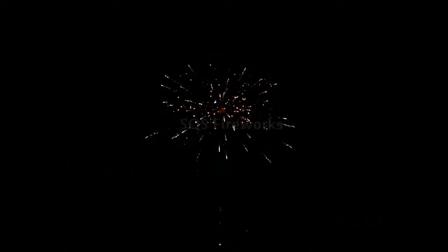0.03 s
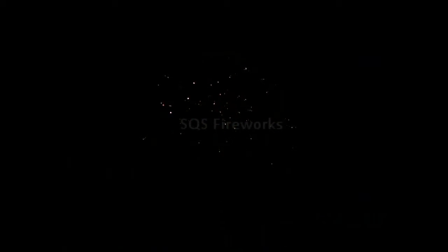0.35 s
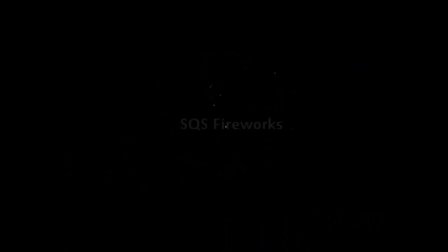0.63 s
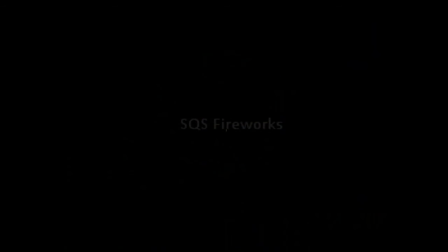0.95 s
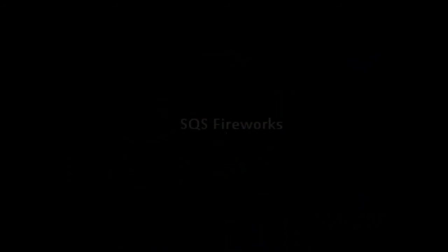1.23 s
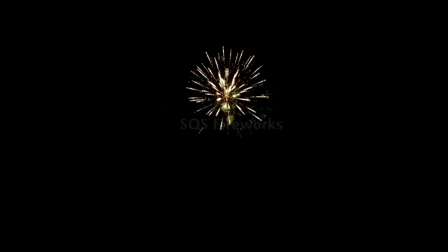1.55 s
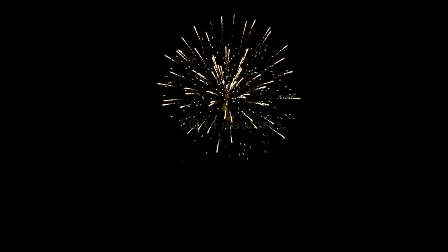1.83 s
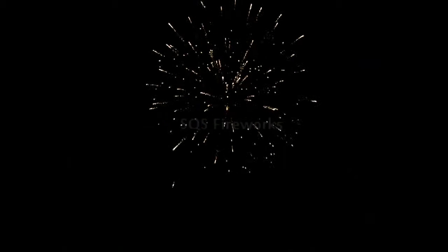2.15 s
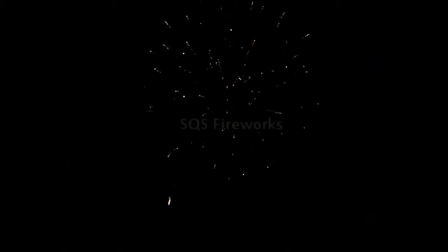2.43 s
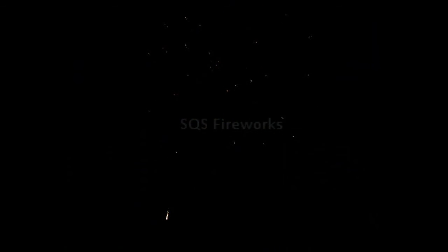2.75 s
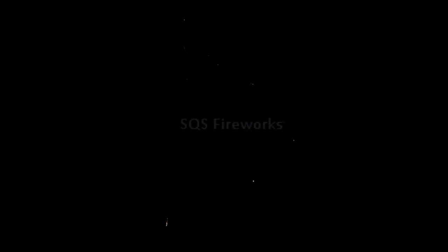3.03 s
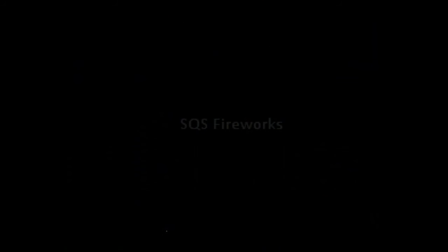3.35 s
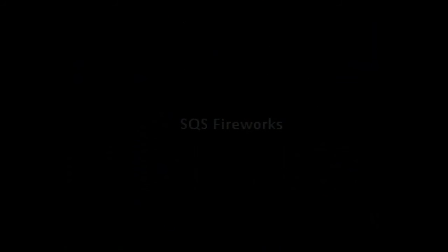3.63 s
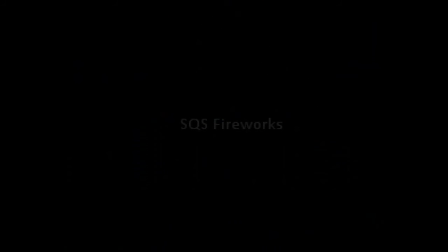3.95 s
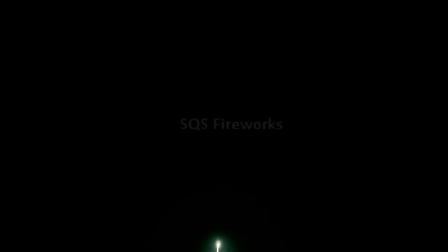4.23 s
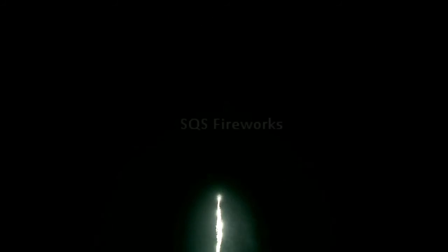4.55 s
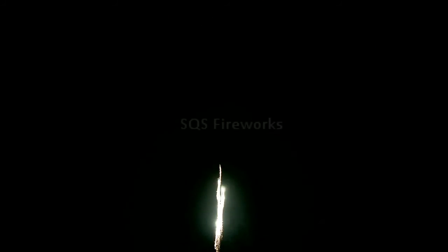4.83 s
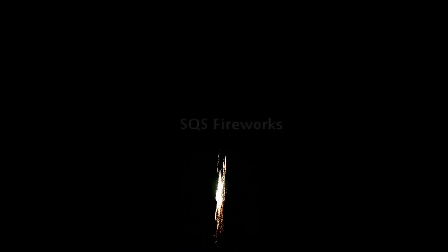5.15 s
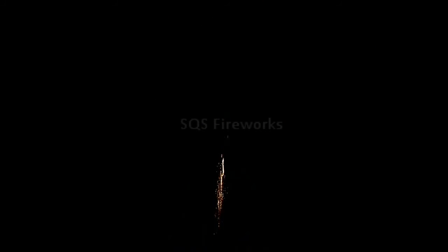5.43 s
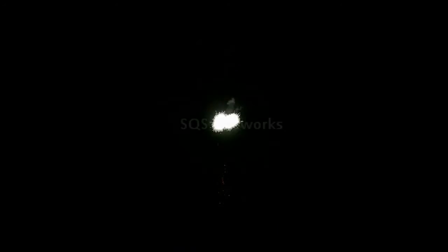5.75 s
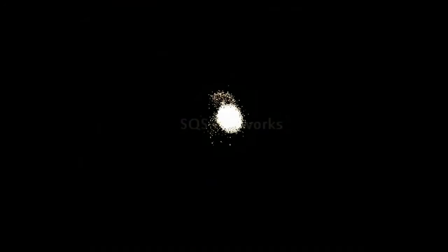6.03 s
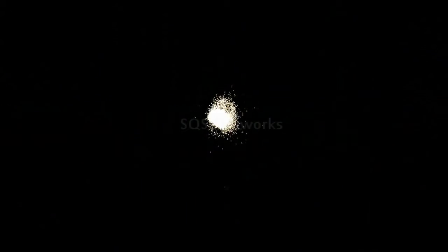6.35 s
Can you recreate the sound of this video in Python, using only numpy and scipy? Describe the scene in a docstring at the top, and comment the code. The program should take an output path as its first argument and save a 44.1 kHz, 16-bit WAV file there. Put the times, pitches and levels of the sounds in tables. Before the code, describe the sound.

A sharp firework bang echoes outdoors, then rapid launch thuds and a faint sizzle lead into a dense run of loud cracks.

```python
"""A fireworks cake fires outdoors at night. Single shells burst overhead, each a shock front, a few low
cycles and a crack, and their echoes roll round the surroundings. Fifteen lift charges thud in quick
succession, each slapped back by walls; the shells sizzle faintly as they climb, then burst in a dense run.
The bangs pull down a gain control and overload a limiter."""
import sys
import numpy as np
from scipy import signal
from scipy.fft import rfft, irfft, next_fast_len
from scipy.io import wavfile
from scipy.ndimage import uniform_filter1d

SR = 44100
rng = np.random.default_rng(int(sys.argv[2]) if len(sys.argv) > 2 else 0)


def inscribe(sig):
    """Save sig as 16-bit PCM at rate SR to the path in sys.argv[1].

    A 1-D sig is mono; a 2-D sig holds one channel per row.
    Samples are clipped to [-1, 1] before scaling.
    """
    pcm = np.round(np.clip(np.atleast_2d(sig).T, -1, 1) * 32767)
    wavfile.write(sys.argv[1], SR, pcm.astype(np.int16))


N = 286209


def gain_of(db):
    """Decibels to gain."""
    return 10 ** (np.asarray(db) / 20)


def unit_rms(x):
    """Scales to rms 1."""
    return x / np.sqrt(np.mean(x ** 2) + 1e-20)


def curve_at(points, hz):
    """Interpolates a table on a log-frequency axis."""
    points_hz, values = np.transpose(points)
    return np.interp(np.log(hz + 1), np.log(points_hz + 1), values)


def clock(length_s):
    """Sample times from zero."""
    return np.arange(int(length_s * SR)) / SR


def add(mix, start_s, sound):
    """Mixes a sound in; start_s may be negative."""
    at = round(start_s * SR)
    sound = sound[..., max(-at, 0):]
    part = mix[:, max(at, 0):][:, :sound.shape[-1]]
    part += sound[..., :part.shape[1]]


def lowpass(x, hz, order=2):
    """Causal Butterworth low-pass."""
    return signal.sosfilt(signal.butter(order, hz, fs=SR, output="sos"), x)


# Likeness of the two channels. Each row: frequency in Hz, left-right correlation.
STEREO_CORRELATION = [(25, .975), (100, .993), (300, 0.99), (550, 0.96), (1000, 0.9), (2000, 0.69),
                      (2600, .6), (3400, -.4), (4700, -.55), (7000, 0.03)]


def scatter(spectrum, samples, grain_db=0, width_db=0):
    """Countless small arrivals of uneven size at two microphones, as coloured noise."""
    length = next_fast_len(samples, True)
    grains = gain_of(grain_db * np.minimum(rng.standard_normal(length // 64 + 1), 2))
    envelope = unit_rms(np.repeat(grains, 64)[:length])
    mid, side = rfft(rng.standard_normal((2, length)) * envelope)
    hz = np.fft.rfftfreq(length, 1 / SR)
    correlation = curve_at(STEREO_CORRELATION, hz)
    side = side * np.sqrt((1 - correlation) / (1 + correlation)) * gain_of(width_db)
    colour = gain_of(curve_at(spectrum, hz)) * np.sqrt(SR / 2)
    return irfft(np.array([mid + side, mid - side]) * colour, length)[:, :samples]


def belt_level_db(belts, delay_s, hz, split_hz=480):
    """Each belt of terrain's echo swells to its peak delay, then falls with path length."""
    treble = (hz ** 2 / (hz ** 2 + split_hz ** 2))[:, None]
    power = 0
    for peak_s, bass_db, treble_db, rise_db, fall_db in belts:
        doublings = np.log2(np.maximum(delay_s, 1e-3) / peak_s)
        swell_db = np.minimum(rise_db * doublings, -fall_db * doublings)
        power = power + gain_of((1 - treble) * bass_db + treble * treble_db + swell_db) ** 2
    return 10 * np.log10(power + 1e-20)


def rolling_echo(spectrum, belts, length_s, grain_db, clump_db, width_db):
    """Echoes return in clumps; the longer their path, the more treble the air absorbs."""
    t = clock(length_s)
    hz, delay_s, frames = signal.stft(scatter(spectrum, len(t), grain_db, width_db), SR, nperseg=512)
    clumps = unit_rms(uniform_filter1d(rng.standard_normal(len(delay_s)), size=4))
    air_db_per_s = 1.79 * (np.minimum(hz[:, None], 4780) / 1000) ** 1.425
    frames *= gain_of(belt_level_db(belts, delay_s, hz) + clump_db * clumps - air_db_per_s * delay_s)
    echo = signal.istft(frames, SR, nperseg=512)[1][:, :len(t)]
    return echo * (1 - np.exp(-t / 0.0045))


# Shell bursts. Each row: start in seconds, blast in dB, nominal ring pitch in Hz, ring length in seconds,
# push in dB re blast, front in dB, crack in dB, crack length in seconds, near scatter in dB,
# echo treble in dB, echo bass in dB.
BURSTS = [(-.413, 4, 240, .009, -8, 0, -2, .008, 6.8, 2.5, 1.8),
          (1.6963, 6, 234, 0.0075, -9, 1, 0, 0.0072, 6.5, 0.5, 3),
          (1.823, 1, 248, 0.0071, -10, -10, -2.5, 0.0076, -1, -19, -7),
          (6.0341, 4.5, 306, 0.0082, -5, 3, -2, 0.0074, 7.5, 3.5, 4),
          (6.0398, 2, 306, 0.01, -9, 7.5, -2, 0.0083, -5, -22, -17),
          (6.1307, 3, 276, 0.0061, -14, 10, -3, 0.01, 3, -2, -1.5),
          (6.164, -12, 483, 0.006, -12, -10, -9, 0.0043, 1, -12, -9),
          (6.1671, 1, 674, 0.0075, -11, -14, -0.5, .009, -3, -17, -13),
          (6.173, 1, 237, 0.0091, -14, -12, -5.5, 0.0072, -1, -18, -16),
          (6.2148, 5, 292, 0.01, -14, 0, 0, 0.0072, 0.5, -11, -8),
          (6.236, 3, 298, 0.0087, -14, -4, -2, 0.0075, -1, -12, -12),
          (6.252, 3.5, 232, .011, -14, -4, -5, 0.0086, -6.5, -14, -18),
          (6.259, 4, 302, 0.0086, -12, -8, -4.5, 0.0088, 3.5, -12, -6),
          (6.3438, -11, 241, .005, -6, -14, -6, .005, -2, -17, -14),
          (6.347, 4, 260, 0.0079, -8, -19, -5, 0.0063, 0, -16, -9),
          (6.366, -2, 281, .009, -12, -3, 0, 0.0076, -4, -9, -8),
          (6.382, 4.5, 236, 0.011, -15, -16, -0.5, 0.0093, 1.5, -6, 0),
          (6.3982, 6, 312, 0.0088, -11, -6, -0.5, 0.008, 2, -12, -10),
          (6.416, -0.5, 328, 0.01, -7, -4, -3.5, 0.0094, -5, -20, -18),
          (6.462, 3, 284, 0.0093, -13, 6, -0.5, 0.0081, -8, -18, -20),
          (6.4793, 1, 331, 0.0068, -10, -6, -2.5, .009, -5, -16, -16)]
# Spectra of the crack, near scatter and roll. Each row: frequency in Hz, relative density in dB.
CRACK_SPECTRUM = [(60, -33), (300, 3), (450, 4), (580, -3.5), (700, 8.5), (1000, -2.5), (1300, -2),
                  (1800, -8.5), (2500, -4.5), (3300, -13.5), (4500, -20.5), (8000, -28.5), (15000, -38)]
NEAR_SPECTRUM = [(40, -62), (90, -43.5), (190, -44), (320, -43), (430, -52.5), (570, -62), (1200, -66),
                 (2600, -68.5), (4200, -81), (6500, -86.5), (10000, -84), (15000, -101)]
ROLL_SPECTRUM = [(25, -53), (50, -41), (100, -40.5), (170, -41.5), (260, -45.5), (370, -51), (480, -56.5),
                 (700, -54.5), (1300, -56), (2000, -59), (2430, -55), (2850, -63.5), (3200, -62.5),
                 (4300, -76), (6500, -86), (9000, -108), (13000, -140)]
# Belts of ground, trees and houses. Each row: peak delay in seconds, bass in dB, treble in dB,
# rise and fall in dB per doubling of delay.
BURST_BELTS = [(.02, -1, -25.5, 4, 4.7), (.1, -1, -3.5, 13, 21), (.29, 0.5, 0.5, 24, 51),
               (.61, 1.5, 3.5, 16.6, 17.6)]


def shell_bursts(front_s=0.00049, front_decay_s=0.00056, sag_s=0.034, push_s=0.014, near_t60_s=0.74):
    """A shock front, sagging low cycles and a tearing crack, then near scatter, a wall and the roll."""
    out, t = np.zeros((2, N)), clock(0.44)
    front = -(1 - t / front_s) * np.exp(-t / front_decay_s)
    for (start_s, blast_db, ring_hz, ring_s, push_db, front_db,
         crack_db, crack_s, near_db, treble_db, bass_db) in BURSTS:
        cycles = np.cumsum(ring_hz * (0.916 + 0.095 * np.exp(-t / sag_s))) / SR
        ring = -np.sin(2 * np.pi * cycles) * np.exp(-(t / ring_s) ** 3)
        push_hz = 0.38 * ring_hz  # a deep cycle or two under the ring
        push = -np.sin(2 * np.pi * push_hz * t) * np.exp(-(t / push_s) ** 2) * gain_of(push_db)
        crack = unit_rms(scatter(CRACK_SPECTRUM, len(t), grain_db=1.5, width_db=-2.5))
        crack *= gain_of(crack_db) * (1 - np.exp(-t / 0.00034)) * np.exp(-(t / crack_s) ** 1.2)
        near = scatter(NEAR_SPECTRUM, len(t), grain_db=1) * gain_of(near_db - 60 * t / near_t60_s)
        add(out, start_s, gain_of(blast_db) * (ring + push) + gain_of(front_db) * front + crack + near)
        add(out, start_s + NEAR_WALL_DELAY_S, gain_of(near_db - 19) * wall_slap(stretch=2.7))
        roll_s = min(3.6, N / SR - start_s + 0.11)
        belts = np.add(BURST_BELTS, [0, bass_db, treble_db, 0, 0])
        roll = rolling_echo(ROLL_SPECTRUM, belts, roll_s, grain_db=1.8, clump_db=0.5, width_db=2)
        add(out, start_s, roll)
    return out


# Background noise. Each row: frequency in Hz, density in dB.
NIGHT_SPECTRUM = [(25, -65.5), (50, -61), (90, -67.5), (160, -75.5), (400, -84), (1000, -81), (2400, -90.5),
                  (4000, -111), (7000, -116), (11000, -118), (15000, -123)]


def night_air():
    """Steady night air and microphone hiss."""
    return scatter(NIGHT_SPECTRUM, N)


# A slap off a facade. Each row: frequency in Hz, relative density in dB.
POP_SPECTRUM = [(100, 12.5), (600, 5), (1400, 2.5), (2600, -9.5), (3600, -33.5), (6000, -42),
                (12000, -79.5)]


def echo_pop(t60_s, top_hz):
    """A short cluster of arrivals that lose their edge and treble on the way."""
    t = clock(0.085)
    envelope = gain_of(-60 * t / t60_s) * (1 - np.exp(-t / (0.037 * t60_s)))
    return lowpass(unit_rms(scatter(POP_SPECTRUM, len(t))) * envelope, top_hz, order=6)


# Distinct echoes. Each row: start in seconds, level in dB, T60 in seconds, cutoff in Hz.
FAR_SLAPS = [(.075, -17, .05, 2800), (.153, -9, .05, 2800), (.197, -8, 0.045, 450),
             (.256, -14.5, .025, 3200), (.316, -12, 0.06, 1800), (.35, -13.5, 0.087, 2000),
             (.605, -26, 0.045, 2900), (.69, -24, 0.072, 2400), (.735, -20, .05, 1100),
             (.755, -22, 0.051, 1900), (.853, -15.5, 0.044, 330), (1.042, -18.5, 0.044, 945),
             (1.1, -24, 0.041, 1100), (1.656, -23, .06, 2400), (1.8508, -5.5, 0.018, 2420),
             (1.93, -20, 0.037, 2800), (2.007, -13, 0.073, 2799), (2.15, -19, .05, 2000),
             (2.218, -19, .06, 3000), (2.288, -8, .05, 2900), (2.307, -9, .05, 450),
             (2.353, -14, 0.056, 1600), (2.382, -9, .045, 600), (2.427, -9, .045, 1800),
             (2.473, -11, 0.069, 2900), (2.844, -17, 0.042, 2900), (2.866, -19.5, 0.048, 2000),
             (3.022, -26, 0.044, 1500), (3.773, -26.5, 0.091, 2800), (3.977, -29.5, 0.044, 2400),
             (4, -34, 0.042, 2400), (4.03, -31.5, 0.14, 2200), (6.188, 0, .03, 1200),
             (6.285, -6, .029, 1700)]


def far_slaps():
    """Facades and hillsides return the bursts as slaps: crisp, smeared or dull."""
    out = np.zeros((2, N))
    for start_s, level_db, t60_s, top_hz in FAR_SLAPS:
        add(out, start_s, gain_of(level_db) * echo_pop(t60_s, top_hz))
    return out


# Bass echoes. Each row: delay in seconds, level in dB re the burst's echo bass, pitch in Hz.
FAR_THUMPS = [(.152, -8.5, 264), (.24, -15.5, 92), (.314, -10, 129), (.344, -10.5, 180), (.353, -7.5, 96),
              (.66, -12.5, 168), (1.246, -15, 129.5), (1.257, -20, 190)]


def far_thumps():
    """Large far surfaces return a few bass cycles of each burst."""
    out, t = np.zeros((2, N)), clock(0.015)
    for delay_s, level_db, hz in FAR_THUMPS:
        thump = np.sin(2 * np.pi * hz * t) * signal.windows.tukey(len(t), 0.5)
        for start_s, *_, bass_db in BURSTS:
            add(out, start_s + delay_s, gain_of(level_db + bass_db) * thump)
    return out


NEAR_WALL_DELAY_S, MAIN_WALL_DELAY_S, FAR_WALL_DELAY_S = 0.0805, 0.1478, 0.249  # there and back
# Ring of a wall's slap. Each row: nominal pitch in Hz, nominal T60 in seconds, relative level in dB.
WALL_MODES = [(507, 0.0062, -7), (914, 0.016, -2), (1240, 0.0078, -15), (1870, 0.0097, -2.5),
              (2452, 0.023, 2.5), (2680, 0.014, 0), (3140, 0.015, -7), (3420, 0.025, -6)]
# Its sharp edge. Each row: frequency in Hz, relative density in dB.
TICK_SPECTRUM = [(800, -27), (2400, -5), (3600, 3), (4500, -16), (6500, -20), (9000, -38), (14000, -70)]


def wall_slap(stretch=1, phase_spread_rad=1.6, tick_t60_s=0.011):
    """A wall returns a sharp tick and a short bright ring, never twice alike."""
    t = clock(0.054)
    ring = np.zeros((2, len(t)))
    for hz, t60_s, level_db in WALL_MODES:
        # Treble reaches the two microphones out of step.
        phase_rad = rng.normal(0, phase_spread_rad) + np.array([[-0.5], [0.5]]) * hz / 3400
        decay_db = 60 * t / (t60_s * stretch * rng.uniform(0.68, 1.57))
        detuned_hz = hz * rng.uniform(0.94, 1.015)
        ring += gain_of(level_db - decay_db) * np.sin(2 * np.pi * detuned_hz * t + phase_rad)
    ring = lowpass(ring * (1 - np.exp(-t / 0.0002)), hz=4600, order=4)
    tick = unit_rms(scatter(TICK_SPECTRUM, len(t), width_db=2)) * gain_of(-14 - 60 * t / tick_t60_s)
    return unit_rms(ring) * gain_of(-19.5) + lowpass(tick, hz=6000, order=6)


# Lift charges. Each row: start in seconds, then thud, snap, wall slap, wall pop and far echo in dB.
LIFT_CHARGES = [(4.1941, -3.5, -17, -6, -20, 2), (4.237, -1, -14.5, -3.5, -22, -2),
                (4.28, -4.5, -14.5, -4, -17, -3), (4.3208, -5.5, -18, -9.5, -19, 0),
                (4.3502, -4, -20, -5, -14, -2), (4.3839, -5.5, -26, -6, -8.5, 1.5),
                (4.4098, -6.5, -21, -7.5, -14, -0.5), (4.449, -1, -16, -4.5, -16, -9),
                (4.487, -3, -22, -12.5, -20, -1.5), (4.535, -3.5, -14, -7, -13, -2),
                (4.5693, -3.5, -15, -7.5, -17, 1.5), (4.6043, -5.5, -23, -7.5, -22, 3),
                (4.6273, -6.5, -24, -8.5, -21, 0), (4.668, -2, -24, -8, -11, 4.5),
                (4.691, -9.5, -14.5, -7, -4.5, 4)]


def lift_charges(pulse_s=0.0027, low_ring_hz=255, low_ring_s=0.012, snap_t60_s=0.017):
    """Each tube fires a pressure pulse with a snap; a brief low ring follows, and three walls answer."""
    out, t = np.zeros((2, N)), clock(0.046)
    age = t / pulse_s
    swing = -np.sin(np.pi * age / (1 + 0.11 * np.minimum(age, 3)) + 0.35)
    pulse = 1.12 * lowpass(swing * np.exp(-(age / 2.15) ** 2), hz=2180)
    low_ring = -np.sin(2 * np.pi * low_ring_hz * t) * np.exp(-(t / low_ring_s) ** 2) * gain_of(-15.5)
    for start_s, thud_db, snap_db, slap_db, pop_db, _ in LIFT_CHARGES:
        snap = unit_rms(scatter(CRACK_SPECTRUM, len(t), width_db=-6.5))
        snap = lowpass(snap * gain_of(snap_db - 60 * t / snap_t60_s), hz=9000, order=4)
        add(out, start_s, gain_of(thud_db) * (pulse + low_ring) + snap)
        near_db = -9 - 68 * (start_s - LIFT_CHARGES[0][0])  # clearest for the first tubes
        add(out, start_s + NEAR_WALL_DELAY_S, gain_of(near_db) * echo_pop(t60_s=0.014, top_hz=3400))
        add(out, start_s + NEAR_WALL_DELAY_S, gain_of(near_db - 3) * wall_slap())
        add(out, start_s + MAIN_WALL_DELAY_S, gain_of(slap_db) * wall_slap())
        add(out, start_s + MAIN_WALL_DELAY_S, gain_of(pop_db) * echo_pop(t60_s=0.021, top_hz=3800))
        add(out, start_s + FAR_WALL_DELAY_S, gain_of(slap_db - 15.5) * wall_slap())
    return out


# Near and far echo spectra of a lift. Each row: frequency in Hz, relative density in dB.
LIFT_NEAR_SPECTRUM = [(25, -58), (50, -51), (90, -50), (270, -58.5), (400, -70), (800, -67.5),
                      (1300, -68.5), (2000, -66), (2450, -62.5), (2850, -69), (3550, -68), (4300, -86),
                      (6000, -87), (10000, -100), (13000, -122)]
LIFT_FAR_SPECTRUM = [(25, -65), (80, -66.5), (200, -65), (400, -72), (700, -67.5), (1150, -63.5),
                     (1800, -67), (2400, -66.5), (3300, -76), (4300, -88.5), (6000, -98.5), (12000, -115)]
# Terrain near and far from the tubes. Each row: peak delay in seconds, bass in dB, treble in dB,
# rise and fall in dB per doubling of delay.
NEAR_BELTS = [(.062, 3.5, 3.5, 20, 13), (.19, 2, -14, 10, 26)]
FAR_BELTS = [(.24, 7.5, 2.5, 27.5, 12.4), (.72, -13.5, -13, 30, 25.4)]


def lift_echoes(patterns=3):
    """Near scatter and a far swell follow every lift; neighbouring tubes get different echo patterns."""
    out = np.zeros((2, N))
    for k in range(patterns):
        near = rolling_echo(LIFT_NEAR_SPECTRUM, NEAR_BELTS, 1.0, grain_db=2.5, clump_db=3, width_db=-7)
        far = rolling_echo(LIFT_FAR_SPECTRUM, FAR_BELTS, 2.2, grain_db=4, clump_db=0.7, width_db=-0.5)
        for start_s, *_, far_db in LIFT_CHARGES[k::patterns]:
            add(out, start_s, near)
            add(out, start_s, gain_of(far_db) * far)
    return out


# Hiss of the tails. Each row: frequency in Hz, relative density in dB.
TAIL_SPECTRUM = [(1200, -100), (2600, -88.5), (4200, -102), (7000, -110), (15000, -112)]
# Its envelope. Each row: time in seconds, level in dB.
TAIL_ENVELOPE = [(4.94, -13), (5.08, 7), (5.16, -1), (5.48, -7), (5.8, -5), (6.02, -0.5)]


def burning_tails():
    """The tails flare and sputter faintly as the shells climb."""
    level_db = np.interp(np.arange(N) / SR, *np.transpose(TAIL_ENVELOPE), left=-np.inf)
    return gain_of(level_db) * scatter(TAIL_SPECTRUM, N, grain_db=3.5)


def scene():
    """All sources at the two microphones, the right slightly louder."""
    mix = shell_bursts() + night_air() + far_slaps() + far_thumps()
    mix += lift_charges() + lift_echoes() + burning_tails()
    return mix * gain_of([[-0.2], [0.2]])


def gain_control(x, threshold_db=-11.05, max_cut_db=4.5, recovery_db_per_s=22):
    """Loud peaks turn the gain down; it recovers at a steady rate."""
    over_db = np.clip(20 * np.log10(abs(x).max(0) + 1e-9) - threshold_db, 0, max_cut_db)
    recovery_db = np.arange(N) * recovery_db_per_s / SR
    cut_db = np.maximum.accumulate(over_db + recovery_db) - recovery_db
    return x * gain_of(-lowpass(cut_db, hz=49.7, order=1))


def limiter(x, release_s=0.02):
    """Flattens peaks; the ceiling drops just after a shock front, and some treble rides on the tops."""
    overload = (abs(x).max(0) > 0.6).astype(float)
    held = np.clip(signal.lfilter([0.16], [1, -np.exp(-1 / (release_s * SR))], overload), 0, 1)
    ceiling = 0.5 + 0.12 * (1 - held)
    flat = x / (1 + (x / ceiling) ** 10) ** (1 / 10)
    excess = x - flat
    excess_treble = excess - lowpass(excess, hz=2500, order=1)
    return flat + 0.062 * excess + 0.21 * excess_treble


def record(dry):
    """20 Hz high-pass, gain control, limiter, 15.9 kHz band limit."""
    highpassed = signal.sosfilt(signal.butter(2, 20, "highpass", fs=SR, output="sos"), dry)
    limited = limiter(gain_control(highpassed))
    band_limit = signal.firwin(255, 15900, window=("kaiser", 9), fs=SR)
    return signal.oaconvolve(limited, band_limit[None], "same", axes=1)


dry = scene()
out = record(dry)
inscribe(out)
```